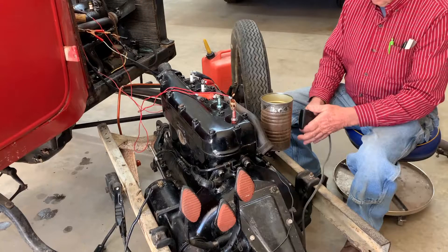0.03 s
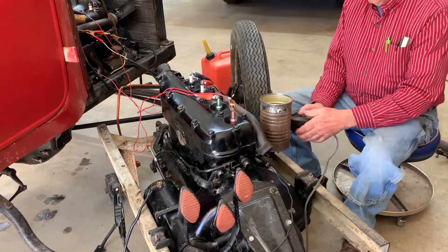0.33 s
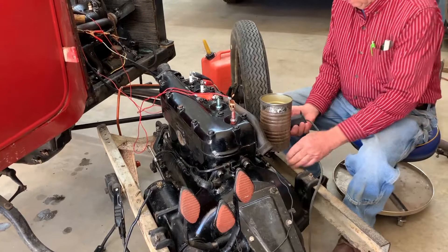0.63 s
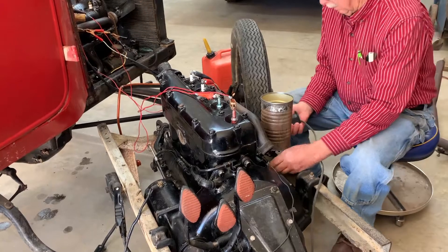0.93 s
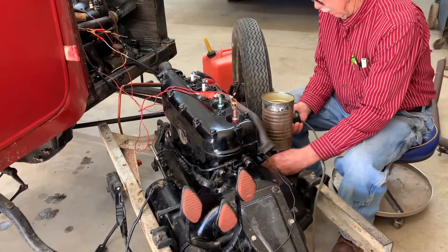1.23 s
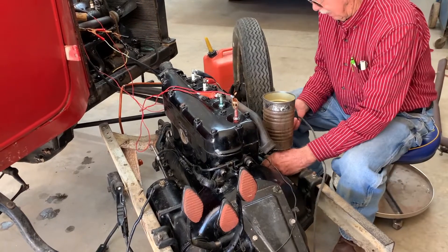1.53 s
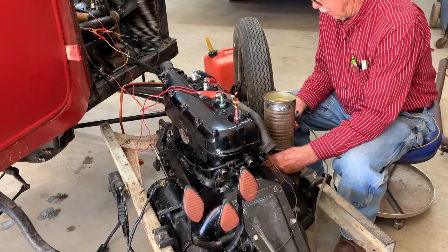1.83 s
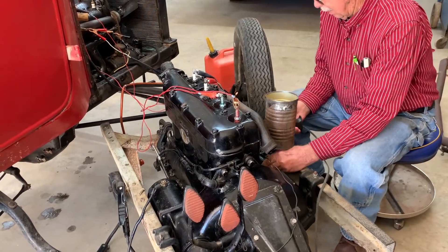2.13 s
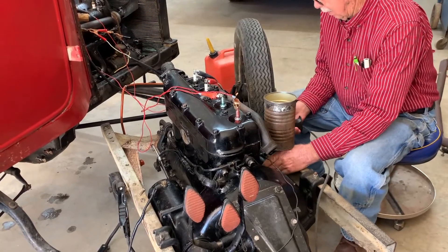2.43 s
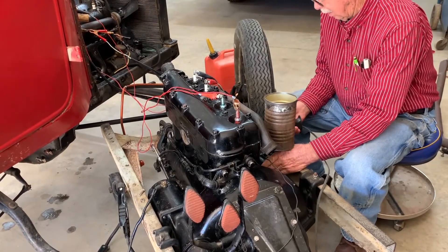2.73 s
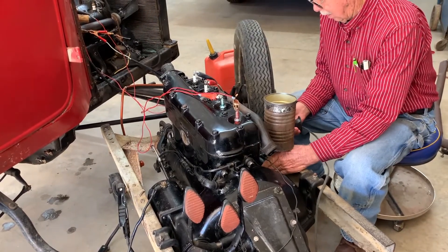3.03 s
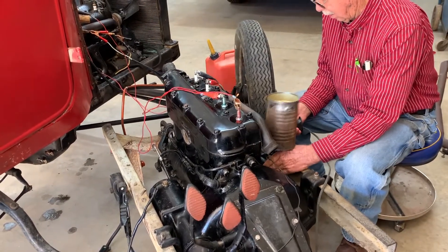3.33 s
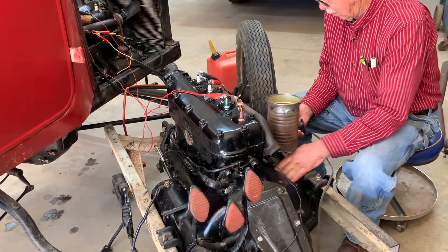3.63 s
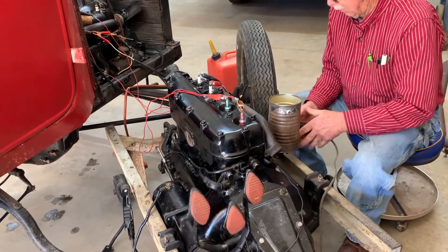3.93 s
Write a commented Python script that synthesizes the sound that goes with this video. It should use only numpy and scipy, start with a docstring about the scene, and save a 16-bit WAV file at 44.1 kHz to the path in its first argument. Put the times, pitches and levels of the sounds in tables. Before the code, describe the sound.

An old petrol engine starts in a quiet workshop. After faint rustling and light knocks, the starter snaps in and grinds with a wavering whine, then the engine catches, spitting rapidly over a low throb and clatter, heard close by.

```python
"""A low hum of room noise and faint handling open the scene in a quiet workshop.
An old four-cylinder petrol engine is then started on a bare chassis: the contact snaps, the pinion
slams in, and the gear grinds, slowing at each compression while the pipe puffs. The engine catches
with spitting jets of gas that excite the modes of the block, coasts for a moment, then picks up
speed over its exhaust throb and valve clatter."""
import sys
import numpy as np
from scipy import signal
from scipy.fft import rfft, irfft, next_fast_len
from scipy.io import wavfile

SR = 44100
rng = np.random.default_rng(int(sys.argv[2]) if len(sys.argv) > 2 else 0)


def generate_wav(sig):
    """Save sig (samples, or channels by samples) to the path in sys.argv[1] as 16-bit PCM at SR."""
    pcm = np.round(np.clip(np.atleast_2d(sig).T, -1, 1) * 32767).astype(np.int16)
    wavfile.write(sys.argv[1], SR, pcm)


N = 176400
T = np.arange(N) / SR


def from_db(db):
    """Amplitude ratio of a level in decibels."""
    return 10 ** (np.asarray(db) / 20)

def unit_rms(x):
    """Normalisation to unit mean power."""
    return x / np.sqrt(np.mean(x ** 2) + 1e-20)

def in_time(rows):
    """Linear interpolation of (time [s], value) points."""
    return np.interp(T, *np.transpose(rows))

def gain_at(points, hz):
    """Gain of a (frequency [Hz], level [dB]) curve, interpolated in log frequency."""
    f, db = np.transpose(points)
    return from_db(np.interp(np.log(hz + 1), np.log(f), db))

def noise(spectrum, gate=1):
    """Source and filter: gated white noise shaped by a spectrum, at unit rms."""
    white = rng.standard_normal(N) * gate
    return unit_rms(irfft(rfft(white) * gain_at(spectrum, np.fft.rfftfreq(N, 1 / SR)), N))

def drift(corner_hz):
    """Random fluctuation: low-passed noise at unit rms."""
    r = np.exp(-2 * np.pi * corner_hz / SR)
    return unit_rms(signal.lfilter([1], [1, -2 * r, r * r], rng.standard_normal(N + SR))[SR:])

def resonate(x, hz, width_hz):
    """A damped resonator with unit peak gain."""
    r = np.exp(-np.pi * width_hz / SR)
    feedback = [1, -2 * r * np.cos(2 * np.pi * hz / SR), r * r]
    return signal.lfilter(np.array([1, 0, -1]) * (1 - r * r) / 2, feedback, x)

def burst(start, rise, hold, decay):
    """Transient envelope: linear attack, exponential decay from start + hold."""
    return np.clip((T - start) / rise, 0, 1) * np.exp(-np.maximum(T - start - hold, 0) / decay)

def swell(middle, half):
    """Gaussian envelope, down to 1/e at middle +/- half."""
    return np.exp(-np.minimum(((T - middle) / half) ** 2, 40))


# room noise spectrum: (frequency [Hz], level [dB])
AMBIENT_SPECTRUM = [(20, -28), (45, -5.5), (72, 5.5), (110, -5.5), (200, -18.5), (450, -29), (800, -40),
                    (2200, -39.5), (3200, -43), (5000, -50), (15000, -40)]

def ambience():
    """Stationary noise, concentrated in the bass, fades in quickly and stays."""
    return from_db(-60) * np.clip((T - 0.083) / 0.016, 0, 1) * noise(AMBIENT_SPECTRUM)


# sleeve movements: (centre time [s], half-length [s], rustle level [dB], hiss level [dB])
RUSTLES = [(0.194, 0.11, -58.5, -72), (0.635, 0.14, -70, -85), (0.87, 0.068, -71, -62),
           (1, 0.039, -75, -72), (1.168, 0.06, -79, -80), (1.854, 0.025, -95, -73)]
# light knocks: (time [s], level [dB], frequency [Hz])
KNOCKS = [(0.755, -65.5, 905), (1.385, -67, 1000), (1.816, -65.5, 1350)]

def handling():
    """Friction of sleeves gives broadband noise; knocks excite heavily damped small parts."""
    rustle_level = sum(from_db(db) * swell(s, half) for s, half, db, _ in RUSTLES)
    hiss_level = sum(from_db(db) * swell(s, half) for s, half, _, db in RUSTLES)
    knocks = 0
    for s, db, hz in KNOCKS:
        band = resonate(rng.standard_normal(N), hz, width_hz=860)
        band = resonate(band, hz, width_hz=860)
        knocks += from_db(db) * burst(s, 0.0029, 0.0053, 0.013) * unit_rms(band)
    rustle = noise([(100, 11), (400, -5), (1800, -3.5), (3200, -12), (4800, -10.5), (9000, -27),
                    (15000, -10)], gate=from_db(2 * drift(56)))
    hiss = noise([(3000, -41), (6000, -19), (11000, -16), (11850, 1), (12600, -8), (14500, -2),
                  (15800, -7.5)])
    return rustle_level * rustle + hiss_level * hiss + knocks


# whistle envelope: (time [s], level [dB])
SQUEAK_LEVEL = [(1.0, -115), (1.13, -87), (1.22, -95), (1.31, -86), (1.38, -87), (1.47, -84), (1.62, -90),
                (1.78, -83), (1.86, -82), (1.95, -88), (2.05, -125)]

def squeak():
    """A faint sinking whistle wavers by random frequency and amplitude modulation."""
    start_hz, sag_hz_per_s, waver_hz, flutter_db = 2676, 120, 32.4, 4.5
    hz = start_hz - sag_hz_per_s * (T - SQUEAK_LEVEL[0][0]) + waver_hz * drift(30)
    level = from_db(in_time(SQUEAK_LEVEL) + flutter_db * drift(13))
    return level * np.sin(2 * np.pi * np.cumsum(hz) / SR)


# starter contact and pinion ticks: (time [s], level [dB], decay [s])
SNAPS = [(1.9795, -7.5, 0.0058), (2.052, -23.5, 0.032), (2.071, -28, 0.0089), (2.106, -18.5, 0.032),
         (2.362, -24, 0.021)]
# their spectrum: (frequency [Hz], level [dB])
SNAP_SPECTRUM = [(300, -26), (2000, -7), (3500, -3.5), (7000, -4), (11500, 3.5), (14500, 4), (16000, 11)]

def contact_snaps():
    """Brief impacts have broad spectra: the contact snaps and the pinion ticks."""
    envelope = sum(from_db(db) * burst(s, 0.00065, 0.0022, decay) for s, db, decay in SNAPS)
    return envelope * noise(SNAP_SPECTRUM)


# modes of the iron block and its covers: (frequency [Hz], bandwidth [Hz], level [dB])
BLOCK_MODES = [(244, 95, 1), (520, 110, -3), (758, 140, -3.5), (1040, 260, -6), (1567, 103, 4),
               (1930, 410, -15), (1930, 84, -11), (2800, 650, -17.5), (4290, 190, -20)]

def block(envelope):
    """Modal superposition: a rough force following the envelope drives modes of alternating sign."""
    def response(force):
        return sum((-1) ** k * from_db(db) * resonate(force, hz, width)
                   for k, (hz, width, db) in enumerate(BLOCK_MODES))
    white = rng.standard_normal(N)
    return response(white * envelope + 1e-12) / np.std(response(white))


# pinion impacts and rebounds: (time [s], clang level [dB], clang decay [s], thud level [dB])
SLAMS = [(2.022, -29.5, 0.0048, -66), (2.0506, -14.5, 0.013, -21.5), (2.11, -24, 0.02, -36),
         (2.189, -32, 0.026, -44)]
# frame shudder: (frequency [Hz], level [dB])
THUD_SPECTRUM = [(80, -16), (140, -5), (210, 1), (280, -2), (370, -15), (500, -11), (800, -11.5),
                 (3000, -33)]

def pinion_slam():
    """Impact excitation: the pinion hits the ring gear, the block clangs and the frame thuds."""
    frame_hz, sag_hz_per_s = 265.2, 900
    clang = block(sum(from_db(db) * burst(s, 0.0019, 0.0043, decay) for s, db, decay, _ in SLAMS))
    shudder, thud = noise(THUD_SPECTRUM), 0
    for s, _, _, db in SLAMS:
        ring = from_db(-1) * np.sin(2 * np.pi * (frame_hz - sag_hz_per_s * (T - s) / 2) * (T - s))
        thud += from_db(db) * burst(s, rise=0.015, hold=0.015, decay=0.046) * (shudder + ring)
    return clang + thud


# gear meshing, sagging at each compression: (time [s], tooth rate [Hz])
TOOTH_RATE = [(2.05, 200), (2.12, 283), (2.2, 240.6), (2.27, 323.3), (2.33, 326.7), (2.395, 248.5),
              (2.455, 370.5), (2.5, 390.3), (2.57, 317.1), (2.635, 412.2), (2.665, 419.8), (2.725, 353),
              (2.755, 352.4), (2.78, 434.9), (2.825, 436.3), (2.87, 364.8), (2.91, 371.5), (2.935, 444),
              (2.97, 434.4), (3.03, 364.5), (3.065, 373.6), (3.09, 447.5), (3.115, 451.6), (3.16, 373),
              (3.205, 368.2), (3.26, 451.8)]
# envelopes of the gear and of its surging rasp: (time [s], level [dB])
GEAR_LEVEL = [(1.975, -140), (1.985, -40), (2.045, -28.5), (2.07, -28.5), (2.118, -24.5), (2.16, -33.5),
              (2.2, -26), (2.228, -30.5), (2.308, -24.5), (2.386, -24.5), (2.418, -25), (2.46, -21.5),
              (2.552, -24.5), (2.59, -26), (2.704, -17.5), (2.74, -20), (2.768, -28), (2.786, -20),
              (2.85, -20), (2.91, -25), (2.995, -17.5), (3.054, -24), (3.136, -17.5), (3.208, -28),
              (3.25, -24), (3.3, -77), (3.5, -140)]
RASP_LEVEL = [(2.24, -40), (2.316, -17.5), (2.326, -25.5), (2.428, -28), (2.458, -19.5), (2.466, -25),
              (2.502, -19.5), (2.54, -22.5), (2.616, -30.5), (2.626, -23), (2.706, -17.5), (2.768, -36),
              (2.78, -20), (2.872, -21), (2.88, -37), (2.888, -22), (2.914, -36), (2.924, -21),
              (2.968, -21), (2.982, -11.5), (2.996, -29), (3.012, -18), (3.068, -63), (3.078, -24),
              (3.164, -30.5), (3.22, -33)]
# housing resonances that colour the whine; grind and rasp spectra: (frequency [Hz], level [dB])
HOUSING_RESPONSE = [(200, -14), (300, -15), (365, -10), (430, -17), (530, 0), (600, -11.5), (660, -3.5),
                    (740, -3.5), (840, -11.5), (950, -12.5), (1120, -11), (1200, -17), (1300, -8),
                    (1380, -11.5), (1490, -8.5), (1600, -7), (1750, -13.5), (2000, -5.5), (2200, -22),
                    (2350, -34), (2500, -19), (3500, -46)]
GRIND_SPECTRUM = [(60, -8.5), (180, -13.5), (350, -10), (480, -1.5), (620, -10), (760, -6), (1000, -0.5),
                  (1600, -2.5), (2050, -6), (2500, -8.5), (3400, -17.5), (4600, -20), (7000, -21.5),
                  (9600, -19.5), (12000, -19.5), (15000, -20.5)]
RASP_SPECTRUM = [(800, -39), (1380, -3), (1500, 4.5), (1750, -2), (2000, 4.5), (2200, -3.5), (2330, -23),
                 (2520, -1.5), (2750, -9.5), (3300, -25.5), (6800, -20.5), (9500, -60), (15000, -25)]

def starter():
    """Periodic tooth contact gives a harmonic whine and modulates the noise of sliding friction."""
    jitter, flutter_db, grind_depth, rasp_depth = 0.007, 3.3, 0.29, 0.55
    rate = in_time(TOOTH_RATE)
    tooth_phase = 2 * np.pi * np.cumsum(rate * (1 + jitter * drift(44.5))) / SR
    whine = 0
    for k in range(1, 8):
        gain = gain_at(HOUSING_RESPONSE, k * rate) * from_db(flutter_db * drift(46))
        whine += gain * np.sin(k * tooth_phase + rng.uniform(0, 2 * np.pi))
    scrape = np.exp(grind_depth * np.cos(tooth_phase)) * from_db(2 * drift(68))
    housing_ring = unit_rms(resonate(rng.standard_normal(N) * scrape, hz=4534, width_hz=160))
    start, end = RASP_LEVEL[0][0], RASP_LEVEL[-1][0]
    surge = from_db(in_time(RASP_LEVEL) - 3) * burst(start, 0.017, end - start, 0.022)
    rasp = surge * noise(RASP_SPECTRUM, np.exp(rasp_depth * np.cos(tooth_phase)))
    grind = noise(GRIND_SPECTRUM, scrape)
    gear = from_db(-3.5) * (np.sqrt(2) * whine + grind) + from_db(-21) * housing_ring
    return from_db(in_time(GEAR_LEVEL)) * gear + rasp


# cranking puffs: (centre time [s], half-length [s], frequency [Hz], level [dB], glide [Hz/s])
PUFFS = [(2.433, 0.05, 63, -29.5, 60), (2.603, 0.039, 73, -28.5, 300), (2.746, 0.011, 88.7, -29.5, -2),
         (2.903, 0.029, 78, -26, 350), (3.063, 0.039, 64, -28.5, 77), (3.204, 0.033, 72.6, -28.5, 246)]

def pipe_puffs():
    """The pipe's air column sounds in short low chirps, mostly rising, during cranking."""
    puffs = 0
    for s, half, hz, db, glide in PUFFS:
        phase = 2 * np.pi * (hz + glide * (T - s) / 2) * (T - s)
        puffs += from_db(db) * swell(s, half) * np.sin(phase)
    return np.sqrt(2) * puffs


# vibration of the running engine: (time [s], level [dB])
VIBRATION_LEVEL = [(3.15, -140), (3.21, -30.5), (3.25, -28), (3.3, -38), (3.44, -26), (3.5, -36.5),
                   (3.6, -31), (3.68, -24.5), (3.8, -30.5), (4.0, -32)]
# valve gear and covers: (frequency [Hz], level [dB])
CLATTER_SPECTRUM = [(100, -33), (240, -2), (400, 3), (900, -1.5), (1700, 0.5), (2500, -3.5), (3600, -10.5),
                    (6500, -12.5), (10000, -7.5), (14500, -8.5), (15600, -7)]

def clatter():
    """Dense impacts of valve gear and loose covers merge into fluctuating noise."""
    return from_db(in_time(VIBRATION_LEVEL)) * noise(CLATTER_SPECTRUM, from_db(1.6 * drift(100)))

def frame_rumble():
    """Forced vibration: the running engine shakes its frame at low frequencies."""
    rumble = noise([(25, -28), (45, -6), (70, 6.5), (150, -4), (260, -9), (600, -51), (3000, -80)])
    return from_db(in_time(VIBRATION_LEVEL) - 2.5) * rumble


# firings: (time [s], hold [s], spit level [dB], thump level [dB],
#           low ring [Hz], its level [dB], high ring [Hz], its level [dB])
FIRINGS = [(3.2391, .014, -11.5, -25, 760.6, -25, 1630, -20.5),
           (3.312, .009, -13.5, -24, 1072, -18, 1600, -17),
           (3.363, 0.0068, -12.5, -23, 740, -33, 1580, -50),
           (3.405, 0.009, -13.5, -25, 1003, -30.5, 1776, -27.5),
           (3.446, 0.0065, -14, -29, 1034, -26, 1606, -24.5),
           (3.655, 0.007, -12, -17, 761.5, -19, 1625, -15.5),
           (3.693, 0.0091, -9, -18.5, 690, -24.5, 1500, -29),
           (3.729, 0.0077, -10.5, -24, 950, -32, 1720, -20),
           (3.763, 0.0065, -9.5, -33, 810, -44, 1530, -16),
           (3.796, 0.0045, -14.5, -24, 807, -34, 1640, -31),
           (3.8276, 0.0067, -19.5, -23, 775, -37, 1584, -44),
           (3.858, 0.0061, -20.5, -29, 790, -37, 1760, -41),
           (3.886, 0.0057, -16.5, -30, 1138, -27, 1530, -25.5),
           (3.914, .0045, -18.5, -34, 786, -28.5, 1630, -28.5),
           (3.941, 0.0045, -20, -35, 760, -31, 1440, -45), (3.967, .005, -23.5, -28, 960, -32, 1620, -52),
           (3.994, .0071, -13, -28, 1000, -19, 1450, -27)]
# mean spectrum of the gas jet: (frequency [Hz], level [dB])
JET_SPECTRUM = [(800, -20), (2500, -3.5), (3600, -4.5), (4200, 4), (4900, -4.5), (6600, 1.5), (8000, -3.5),
                (9600, 2), (11500, 2.5), (13000, -0.5), (14600, 10), (15600, 1)]

def firing_spits():
    """Turbulent jet noise sputters at each firing, with fresh spectral peaks and dips each time."""
    hz = np.geomspace(500, 16000, 90)
    mean_db, spread_db = 20 * np.log10(gain_at(JET_SPECTRUM, hz)), 3.5
    sputter = from_db(1.6 * drift(250))
    spits = 0
    for s, hold, db, *_ in FIRINGS:
        spectrum = np.c_[hz, mean_db + spread_db * rng.standard_normal(len(hz))]
        spits += from_db(db) * burst(s, 0.0025, hold, 0.0051) * noise(spectrum, sputter)
    return spits

def firing_barks():
    """Damped oscillation: each firing rings at two wavering pitches and shakes the block."""
    waver_hz = 80
    wavers = [np.cumsum(waver_hz * drift(101.1)) / SR for _ in range(2)]
    rings = shake = 0
    for s, hold, _, _, low_hz, low_db, high_hz, high_db in FIRINGS:
        envelope = burst(s, 0.0062, hold, 0.0068)
        for hz, db, waver in zip((low_hz, high_hz), (low_db, high_db), wavers):
            rings += from_db(db) * envelope * np.sin(2 * np.pi * (hz * T + waver))
            shake += from_db(db) * envelope / 2
    return from_db(-2) * block(shake) + from_db(-1) * np.sqrt(2) * rings

def exhaust_thumps():
    """Pipe resonance: a low note and its octave ring briefly just after each firing."""
    pipe_hz, delay_s = 71, 0.0249
    thumps = 0
    for s, _, _, db, *_ in FIRINGS:
        phase = 2 * np.pi * pipe_hz * (T - s - delay_s)
        note = np.sin(phase) + from_db(-6) * np.sin(2 * phase)
        thumps += from_db(db) * burst(s + delay_s, 0.0058, 0.0017, 0.013) * note
    return np.sqrt(2) * thumps


# envelope of the exhaust note: (time [s], level [dB])
THROB_LEVEL = [(3.24, -140), (3.28, -55), (3.45, -35.5), (3.6, -38), (3.7, -31.5), (3.85, -31.5),
               (4.0, -26)]
# pipe response: (frequency [Hz], level [dB])
PIPE_RESPONSE = [(25, -44), (42, -9), (62, -5), (78, -5.5), (100, -7.5), (150, -18.5), (250, -20.5),
                 (600, -17), (3000, -80)]

def exhaust_throb():
    """Periodic forcing: the pipe sounds harmonics of the stroke rate, in step with the firings."""
    coast_hz, delay_s = 25, 0.02785
    times = np.array(FIRINGS)[:, 0]
    strokes = np.maximum(1, np.floor(np.diff(times) * coast_hz))  # a long gap holds unfired strokes
    cycle = np.interp(T - delay_s, times, np.r_[0, np.cumsum(strokes)])
    rate = np.gradient(cycle) * SR
    note = sum(gain_at(PIPE_RESPONSE, k * rate) * np.cos(2 * np.pi * k * cycle) for k in range(1, 9))
    return from_db(in_time(THROB_LEVEL)) * np.sqrt(2) * note


# lead of left over right: (frequency [Hz], phase [rad])
STEREO_PHASE = [(0, 0), (400, 0), (6500, -6.28), (16000, 2.8)]
# left minus right: (frequency [Hz], level [dB])
STEREO_BALANCE = [(60, -2.4), (125, -0.2), (250, 2.2), (700, 1), (1200, 1), (2500, -0.5), (4300, 3.5),
                  (6500, 0.5), (15000, -0.5)]
# early reflections off chassis and floor; wall reverberation: (frequency [Hz], level [dB])
EARLY_SPECTRUM = [(100, -23.5), (300, -15), (1000, -4), (2200, -2), (5000, -3.5), (8000, -14), (15000, -14)]
REVERB_SPECTRUM = [(60, -12), (250, 1.5), (700, 0.5), (4500, 1), (8000, -13), (15000, -8)]

def workshop(x, wet_db):
    """Direct sound, early reflections and an exponentially decaying diffuse field add in stereo."""
    wall_delay_s, t60_s = 0.0079, 0.22
    size = next_fast_len(N + SR)
    hz = np.fft.rfftfreq(size, 1 / SR)
    spectrum = rfft(x, size)
    lead = np.interp(hz, *np.transpose(STEREO_PHASE))
    group_delay = np.interp(hz, np.linspace(0, SR / 2, 60), rng.uniform(.001, .005, 60))
    early = np.exp(-2j * np.pi * np.cumsum(group_delay) * hz[1]) * gain_at(EARLY_SPECTRUM, hz)
    channels = []
    for side in (1, -1):
        tail = rng.standard_normal(N) * (T > wall_delay_s) * from_db(-60 * T / t60_s)
        tail /= np.sqrt(np.sum(tail ** 2))
        diffuse = rfft(tail, size) * from_db(wet_db) * gain_at(REVERB_SPECTRUM, hz)
        near = np.exp(.5j * side * lead) * (1 + side * early)
        balance = gain_at(STEREO_BALANCE, hz) ** (side / 2)
        channels.append(irfft(spectrum * (near + diffuse) * balance, size)[:N])
    return np.array(channels)


def scene():
    """Superposition of all sources in the workshop, with impacts, firings and exhaust the driest."""
    background = from_db(-1.5) * (ambience() + handling() + squeak() + clatter() + frame_rumble())
    impacts = contact_snaps() + pinion_slam()
    engine = pipe_puffs() + firing_spits() + firing_barks() + exhaust_thumps() + exhaust_throb()
    return (workshop(background, wet_db=-5.5) + workshop(starter(), wet_db=-5.5)
            + workshop(impacts + engine, wet_db=-9))

def record(dry):
    """Band limiting and soft saturation: deep bass is thinned, peaks are rounded, the top is cut."""
    thin = signal.sosfilt(signal.butter(4, 42, "high", fs=SR, output="sos"), dry)
    rounded = .85 * np.tanh(thin / .85)
    return signal.sosfilt(signal.ellip(12, .1, 80, 15850, fs=SR, output="sos"), rounded)


dry = scene()
out = record(dry)
generate_wav(out)
```